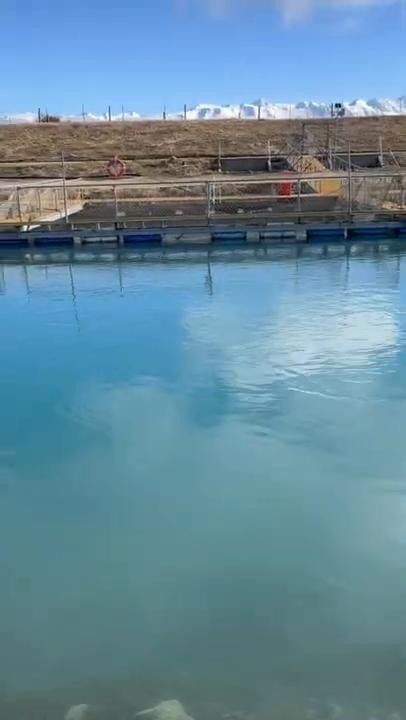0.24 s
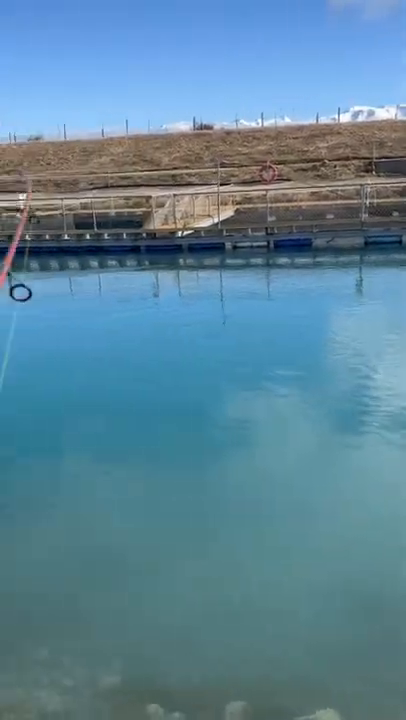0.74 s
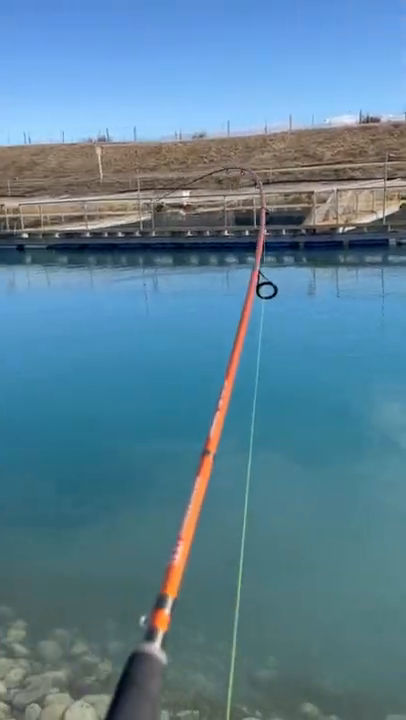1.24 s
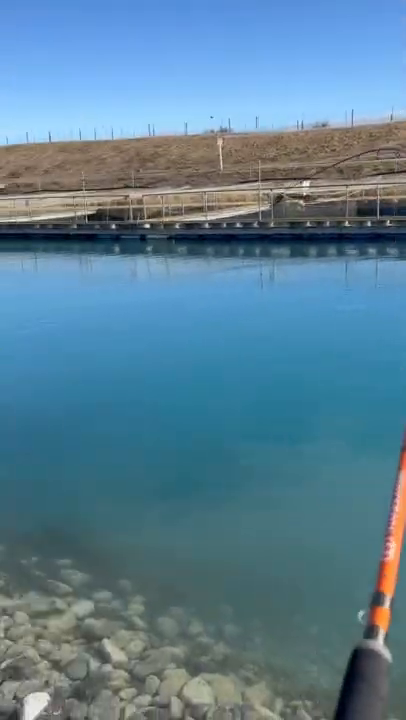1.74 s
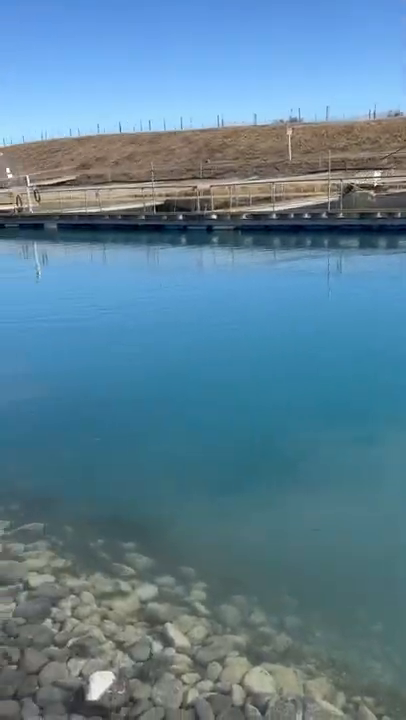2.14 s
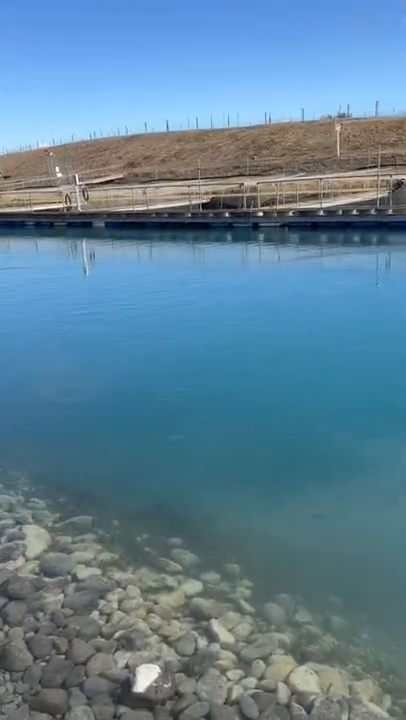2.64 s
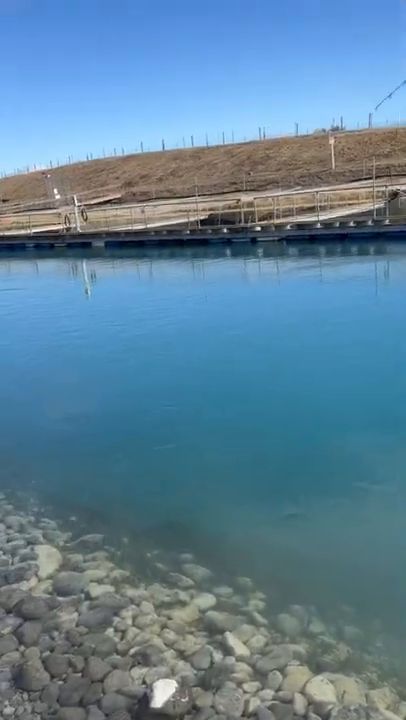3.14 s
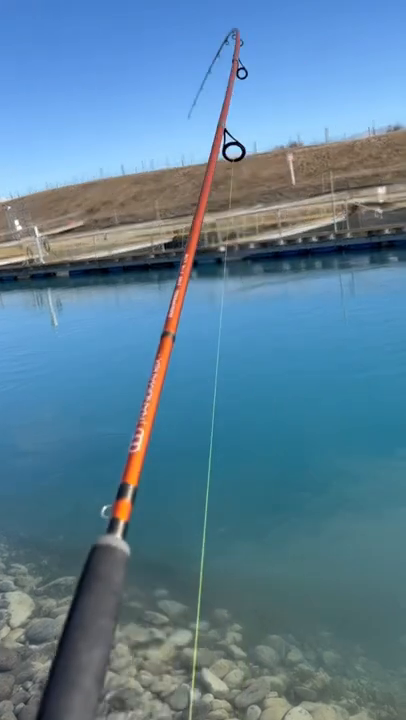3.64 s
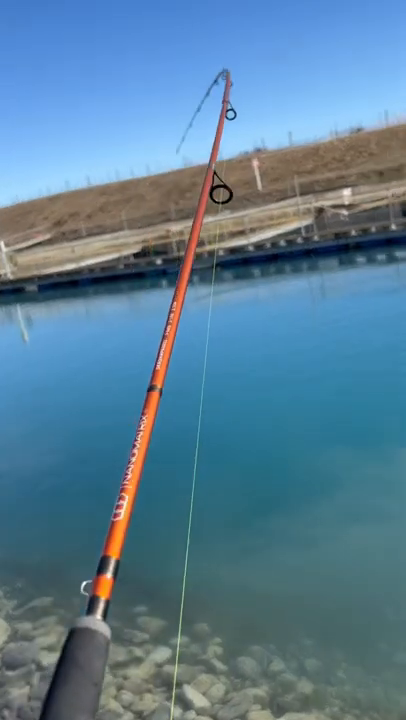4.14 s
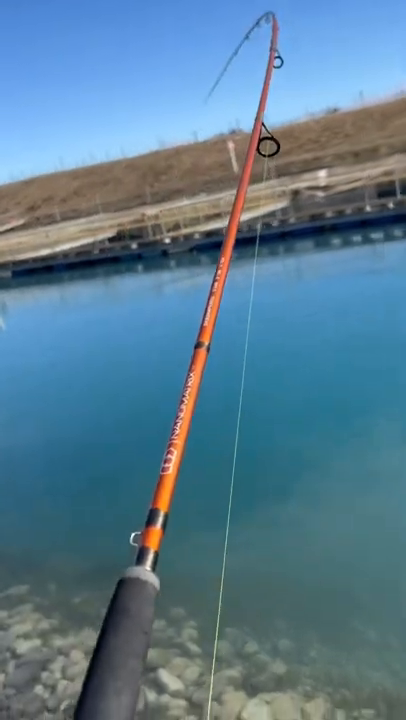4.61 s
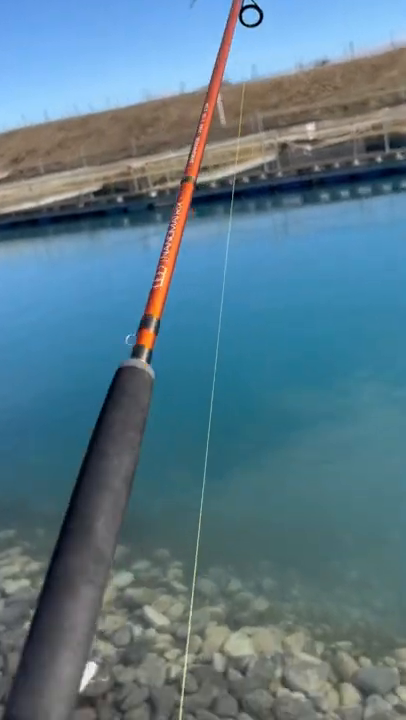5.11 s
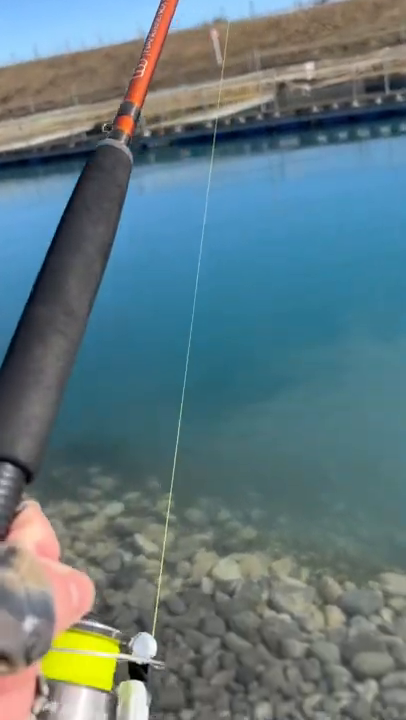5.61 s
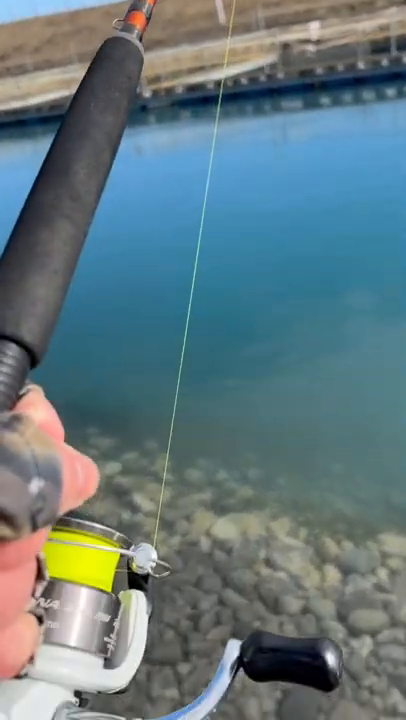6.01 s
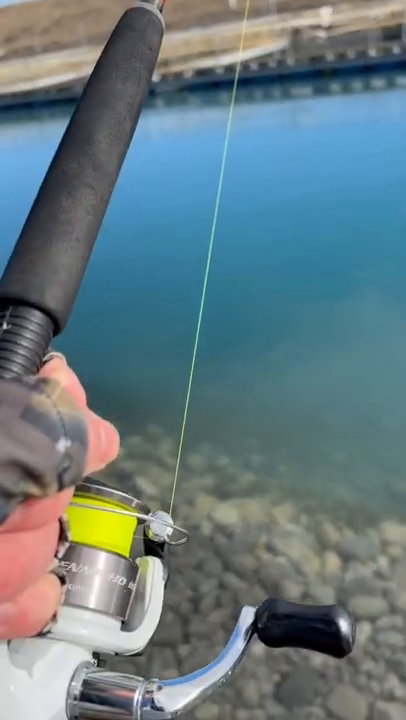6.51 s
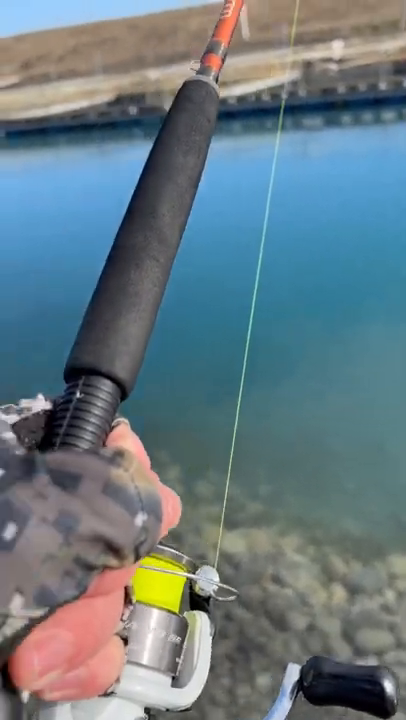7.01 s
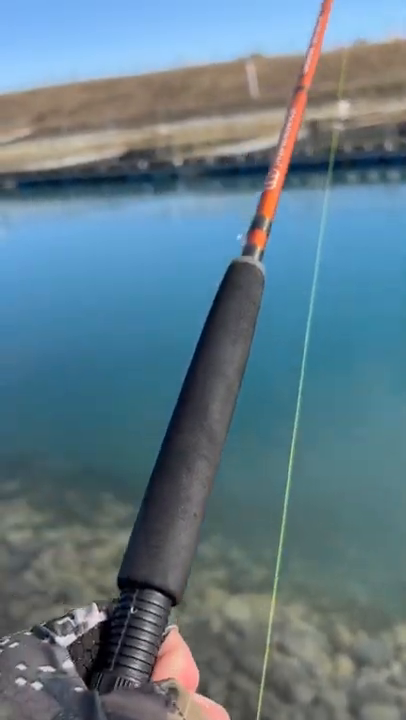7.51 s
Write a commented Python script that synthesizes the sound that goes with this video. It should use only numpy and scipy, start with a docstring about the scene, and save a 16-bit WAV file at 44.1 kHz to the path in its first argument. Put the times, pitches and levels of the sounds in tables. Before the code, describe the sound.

In quiet open air by water, a fishing reel is already starting to pay out line. From 0 s its clicker quickly builds into a bright, dry ratcheting buzz, around seventy to over a hundred clicks a second, surging near 1 s and easing by 1.7 s. It picks up again around 2.2 s, sags near 3.3 s, rises around 4.2 s, then eases. Beneath it the braid hums faintly and rubs with a grainy rasp that rings the rod. Soft low wind puffs land near 0.5 and 1.9 s; a hand rustles at 1.7 s. At 5.2 s the buzz drops to separate, louder, close clicks, about twenty-five a second, slowing to about sixteen near 6 s with small dull grip knocks around 5.9 s. The clicks then gradually quicken again to over twenty a second, softening slightly towards the end at 7.75 s. Thin metallic ringing and short echoes follow the clicks.

```python
"""A reel clicker buzzes as a fish pulls line, then slows to louder single clicks as the microphone closes in.
A spring snaps over the spool's teeth: each snap strikes short body modes and long rings of the metal spool.
Echoes follow. The braided line hums over the roller, and its grainy friction rings the rod.
The hand rustles and knocks on the grip; wind puffs are shaped noise, over hiss and a far low hum."""
import sys
import numpy as np
from scipy import signal
from scipy.fft import rfft, irfft
from scipy.io import wavfile
from scipy.ndimage import uniform_filter1d

SR = 44100
rng = np.random.default_rng(int(sys.argv[2]) if len(sys.argv) > 2 else 0)


def invert_db(x):
    """Field ratio 10**(x/20) for x, a level in decibels (scalar or array-like)."""
    u = np.asarray(x, float) / 20
    return 10 ** u


def to_wav(s):
    """Save 16-bit WAV."""
    ch = np.atleast_2d(s).T  # columns
    pcm = np.round(np.clip(ch, -1, 1) * 32767)  # PCM
    wavfile.write(sys.argv[1], SR, pcm.astype(np.int16))


N = 342061
TEETH = 18  # per spool turn


def curve(table):
    """Columns of a table, joined by straight lines in time."""
    s, *columns = np.transpose(table)
    return [np.interp(np.arange(N) / SR, s, c) for c in columns]


def unit(x):
    """Scale to rms one."""
    return x / np.sqrt(np.mean(x ** 2))


def band(x, hz, width_hz):
    """Two-pole resonance, gain one at its centre."""
    return signal.lfilter(*signal.iirpeak(hz, hz / width_hz, SR), x)


def ring(s, size, hz, t60_s, rise_s=.0001):
    """A decaying mode struck at times s; complex sizes carry the starting phase."""
    pole = 2j * np.pi * hz / SR - np.log(1000) / (t60_s * SR)
    at = np.ceil(s * SR).astype(int)
    blows = np.zeros(size.shape[:-1] + (N,), complex)
    blows[..., at] = size * np.exp(pole * (at - s * SR))
    # the contact lasts a moment, so the mode swells before it fades
    swell = np.exp(pole - 1 / (rise_s * SR))
    return signal.lfilter([1 - abs(swell)], np.poly([np.exp(pole), swell]), blows).imag


def walk(rate, size=N, per=SR):
    """Slow chance, spread one: a fresh value every per / rate steps, smoothed twice."""
    k = max(int(per / rate), 1)
    steps = np.repeat(rng.standard_normal(size // k + 1), k)
    smooth = uniform_filter1d(uniform_filter1d(steps, k), k)
    return unit(smooth[:size])


def wide(side_db, top_hz=1400):
    """Noise for both ports with an opposed part at side_db that fades out in the treble."""
    side = signal.sosfilt(signal.butter(4, top_hz, fs=SR, output="sos"), rng.standard_normal(N))
    return rng.standard_normal(N) + invert_db(side_db) * side * np.array([[1], [-1]])


def swells(table):
    """Bell-shaped swells of two layers; the second is given in dB above the first."""
    t, first, second = np.arange(N) / SR, 0, 0
    for s, length_s, db, above_db in table:
        bell = invert_db(db) * np.exp(-(2 * (t - s) / length_s) ** 2 / 2)
        first = first + bell
        second = second + invert_db(above_db) * bell
    return first, second


# spool turning while it buzzes: time_s, teeth_passed_count
SPOOL_TURN = [(0.0139, 0), (0.096, 4), (0.1679, 11), (0.3978, 27), (0.4068, 28), (0.5677, 36), (0.5964, 39),
              (0.8382, 66), (1.0394, 89), (1.1676, 103), (1.1765, 104), (1.4639, 125), (1.7003, 138),
              (1.8072, 141), (1.9521, 149), (2.0486, 156), (2.2012, 170), (2.317, 178), (2.478, 193),
              (2.636, 205), (2.6782, 208), (2.8852, 217), (3.1235, 227), (3.3086, 231), (3.5229, 240),
              (3.7121, 249), (3.7972, 252), (4.0976, 269), (4.3152, 283), (4.4684, 290), (4.7126, 302),
              (4.7692, 304), (5.0858, 316), (5.1786, 319)]
# surge once a turn, as the drag grips harder on one side: teeth_passed_count, swing_teeth
DRAG_SURGE = [(100, .8), (160, .3)]
# single slow clicks: time_s
SLOW_CLICKS_S = [5.2146, 5.2513, 5.2824, 5.323, 5.3592, 5.3985, 5.4414, 5.4776, 5.5204, 5.561, 5.598,
                 5.6404, 5.6798, 5.718, 5.7614, 5.8075, 5.862, 5.919, 5.9819, 6.0489, 6.1085, 6.168, 6.2316,
                 6.2886, 6.3415, 6.402, 6.46, 6.5173, 6.5693, 6.6233, 6.6804, 6.7337, 6.7848, 6.8326,
                 6.8822, 6.936, 6.9864, 7.0396, 7.0894, 7.143, 7.1907, 7.2385, 7.286, 7.3343, 7.3834, 7.43,
                 7.4737, 7.5175, 7.5613, 7.604, 7.641, 7.686, 7.7363]
# click strength before spring load and mode gains: time_s, level_db
CLICK_STRENGTH = [(0, -26), (.3, -24), (1.1, -24.5), (1.63, -26.5), (1.88, -25.5), (2.6, -26.5),
                  (3.5, -27.5), (3.8, -26), (4.0, -27.5), (4.5, -27), (5.17, -25), (5.22, -19.5),
                  (5.55, -20.5), (5.7, -17.5), (6.27, -18), (6.46, -20), (6.6, -19), (7.24, -20.5),
                  (7.7, -26)]


def click_times():
    """The spool turns smoothly between the listed angles, surging once a turn; each tooth gives a click."""
    hardest_tooth = 17  # where the drag grips hardest

    def surged(k):
        swing_teeth = np.interp(k, *np.transpose(DRAG_SURGE))
        return k + swing_teeth * np.sin(2 * np.pi * (k - hardest_tooth) / TEETH)

    s, teeth = np.transpose(SPOOL_TURN)
    k = surged(np.arange(teeth[-1] + 1))
    teeth = surged(teeth)
    # cubic Hermite curve of time against teeth
    slope = np.gradient(s, teeth)
    j = np.clip(np.searchsorted(teeth, k, "right") - 1, 0, len(s) - 2)
    h = np.diff(teeth)[j]
    u = (k - teeth[j]) / h
    bend = h * u * (1 - u) * ((1 - u) * slope[j] - u * slope[j + 1])
    fast = s[j] + np.diff(s)[j] * u * u * (3 - 2 * u) + bend
    s = np.r_[fast, SLOW_CLICKS_S]
    return s, np.interp(s, *np.transpose(CLICK_STRENGTH))


def spool_angle(count):
    """Spool angle in radians at each click, one tooth per click."""
    return 2 * np.pi * np.arange(count) / TEETH


def ports(count, side_db):
    """Left and right hear each blow slightly differently, drifting from tooth to tooth."""
    side = invert_db(side_db) * (walk(1, count, per=4) + 1j * walk(1, count, per=3.7))
    return 1 + side * np.array([[1], [-1]])


# stray ticks between clicks, before mode gains: time_s, level_db
STRAY_TICKS = [(2.9654, -35), (3.239, -31), (3.3144, -33), (3.3814, -36), (3.8823, -31), (4.0015, -27),
               (4.1684, -36), (5.076, -34), (5.106, -35), (5.13, -37), (5.14, -37), (5.17, -30),
               (5.2264, -30), (5.3343, -28), (5.4652, -27), (5.5112, -32), (5.577, -28), (5.6205, -27),
               (5.664, -31), (5.744, -25), (5.968, -29), (6.0711, -35)]


def stray_ticks():
    """Listed ticks plus faint ones at chance times."""
    faint_count, start_s, end_s, level_db, spread_db = 14, 2.4, 7.4, -38, 8.0
    when, how = rng.random((faint_count, 2)).T
    faint = np.c_[start_s + when * (end_s - start_s), level_db + spread_db * (how - .5)]
    return np.r_[STRAY_TICKS, faint].T


# short modes of clicker and reel body: pitch_hz
BODY_HZ = [1350, 2200, 3200, 4200, 5150, 6400, 7900, 9200, 10300, 11500, 12800, 13800, 15100, 16200]
# their decay: t60_s
BODY_T60_S = [.018, .0045, .004, .0032, .003, .0033, .0045, .0036, .0035, .0035, .004, .0033, .0038, .0035]
# gain of each mode in four ways of holding the reel (a negative swing is quietest at its angle):
# gain_db, swing_per_turn_db, loudest_deg, swing_per_half_turn_db, loudest_deg
ASIDE_MODES = [(-22.5, 0, 150, 4.4, 140), (-19, 5.5, 210, 5, 89), (-5.5, 6.5, 79, -0.5, 61),
               (-19, -2.5, 47, 11, 6.8), (-15.5, 2, 190, -2, 88), (-1.5, 0, 29, 3, 70),
               (-1.1, 2.5, 81, 4.5, 181), (-1, -1, 87, 1.5, 190), (-1.9, 3.7, 113, -0.3, 77),
               (0.4, 2, 280, -1, 55), (-4, 3, 240, 6, 39), (0, -1, 990, 5.5, 146), (-17, -7, 254, -12, 150),
               (-7, 8, 280, -13, 71)]
BEHIND_MODES = [(-13.5, 1.4, 170, 0.79, 130), (-15, 0.3, 140, 2.1, 120), (-11, 7, 73, 0.2, 144),
                (-15.5, 2.1, 160, 1.0, 12), (-3.5, 2.5, 150, 2.9, 150), (-0.7, 1.9, 34, 1, 120),
                (0.5, 2.2, 48, 3.8, 162), (-1.1, 0.5, 73, 3.8, 184), (-2, 1.2, 140, 0.6, 87),
                (0, 1.7, 290, 0.5, 101), (0.2, 2.2, 280, 1.1, 100), (-7, 2.5, 370, 2.9, 155),
                (2, 0.5, 254, 0.9, 140), (-8, 1.0, 250, 1.4, 56)]
BELOW_MODES = [(-22.5, 0.56, 170, 0.2, 230), (-16, 3.9, 125, 5.8, 112), (-8.5, 7.3, 73, 1.4, 137),
               (-10.5, 3.3, 22, 0.4, 19), (-8, 3.2, 160, 2.3, 177), (-4.5, 2.9, 126, 1.9, 90),
               (-0.5, 0.96, 6, 1.4, 12), (-2.2, 2.7, 200, 1.1, 130), (-2, 3.2, 180, 3.4, 7),
               (-1, 1.6, 300, 2.7, 72), (-17, 1.3, 280, 0.3, 81), (3.5, 3.4, 250, 1.8, 160),
               (-25, 3.5, 150, 1.8, 220), (7, 3.2, 280, 6, 8)]
NEAR_MODES = [(-22, 2.4, 437, 1.4, 55), (-17, 5.1, 116, 2.8, 79), (-17.5, 13.5, 25, 4.6, 105),
              (-11, 4.2, 21, 0.57, 3.7), (-6.5, 5.4, 108, 0.61, 3), (-14, 0.86, 140, 4.8, 50),
              (-2.5, 0.6, 260, 1, 280), (-0.5, 4.7, 94, 5.2, 173), (-3, 1.7, 85, 1.8, 100),
              (-5, 6, 318, 0.77, 100), (-3, 6, 370, 0.77, 10), (4, 1.6, 120, 5.4, 184),
              (-10.5, 0.34, 49, 7.7, 22), (8, 1.2, 190, 4.6, 12)]
# moves from one hold to the next: time_s
HOLD_CHANGES_S = (1.8, 2.75, 5.2)


def body_snaps(s, click_db, lead_s):
    """Each click or tick strikes the short modes, their gains turning with the spool."""
    scatter_db, phase_wobble_rad, lag_cycles = 1.9, .4, 1.52
    count = len(s)
    angle = spool_angle(count)
    hold = np.searchsorted(HOLD_CHANGES_S, s)
    tick_s, tick_db = stray_ticks()
    snap = 0
    for k, (hz, t60_s) in enumerate(zip(BODY_HZ, BODY_T60_S)):
        holds = np.array([ASIDE_MODES[k], BEHIND_MODES[k], BELOW_MODES[k], NEAR_MODES[k]])
        db, turn_db, turn_deg, half_db, half_deg = holds[hold].T
        db = db + turn_db * np.cos(angle - np.radians(turn_deg))
        db = db + half_db * np.cos(2 * (angle - np.radians(half_deg)))
        db = db + scatter_db * walk(1, count, per=2)
        # the path to the microphone changes with the spool angle; the phase alternates from mode to mode and
        # wobbles slowly from click to click
        phase = np.pi * k + phase_wobble_rad * walk(1, count, per=3)
        size = invert_db(click_db + db - 10.5) * np.exp(1j * phase) * ports(count, -18.5)
        tick_phase = 2 * np.pi * rng.random(len(tick_s))
        stray = invert_db(tick_db + BELOW_MODES[k][0] - 12) * np.exp(1j * tick_phase) * np.ones((2, 1))
        # low modes build up later than high ones
        late_s = np.r_[s, tick_s - lead_s] + lag_cycles / hz
        snap = snap + ring(late_s, np.c_[size, stray], hz, t60_s, rise_s=0.000067 + 0.22 / hz)
    return snap


# paths off the hand and reel frame: delay_ms, swing_ms, longest_deg, gain_db
GLANCING_PATHS = [(.5, .15, 60, -13), (1.102, .3, 200, -6.5)]


def glancing(direct, s):
    """Adds glancing paths, longer or shorter as the spool turns."""
    now, count = np.arange(N), len(s)
    click = np.clip(np.searchsorted(s * SR, now) - 1, 0, count - 1)
    snap = direct
    for delay_ms, swing_ms, deg, db in GLANCING_PATHS:
        ms = delay_ms + swing_ms * np.cos(spool_angle(count) - np.radians(deg))
        ms = ms + .04 * rng.standard_normal(count)
        lag = (ms * SR / 1000).round().astype(int)[click]
        snap = snap + invert_db(db) * direct[:, np.maximum(now - lag, 0)]
    return snap


# long rings of the metal spool: pitch_hz
SPOOL_RING_HZ = [4708, 4671, 7600, 9950, 14856, 14790]
# their strength: relative_db
SPOOL_RING_DB = [1, -9, -7, -4.5, 7.5, -9]
# their decay: t60_s
SPOOL_RING_T60_S = [.22, .22, .045, .04, .05, .04]
# reach of the rings below 5 kHz, before click-rate gain: time_s, level_db
RING_REACH = [(0, -71), (.7, -67), (.85, -59), (1.4, -65.5), (2.1, -61), (3.2, -61), (3.35, -66),
              (4.4, -68.5), (5.7, -62), (5.94, -57), (6.1, -67), (7.25, -63), (7.4, -59), (7.76, -62)]


def spool_rings(s, click_db):
    """Clicks strike long spool modes; those above 5 kHz partly follow click strength."""
    scatter_db, high_share, high_db = 3.5, .45, -40
    count = len(s)
    low_db = np.interp(s, *np.transpose(RING_REACH))
    # slower clicks must each be heard louder for the same steady ring
    low_db = low_db + 10 * np.log10(np.gradient(s) / 0.014) + 6
    rings = 0
    for hz, db, t60_s in zip(SPOOL_RING_HZ, SPOOL_RING_DB, SPOOL_RING_T60_S):
        low = hz < 5000
        reach_db = low_db if low else high_share * click_db + high_db
        size = invert_db(reach_db + db + scatter_db * rng.standard_normal(count))
        size = size * np.exp(2j * np.pi * rng.random(count))
        rings = rings + ring(s, size * ports(count, -11 if low else -24), hz, t60_s)
    return rings


def reel(lead_s=.0004):
    """Every click strikes the short body modes and the long spool rings."""
    s, click_db = click_times()
    s = s - lead_s
    # at speed the spring has less time to load, so it snaps more weakly
    click_db = click_db + 1.6 * np.log2(np.minimum(np.gradient(s) / 0.01, 1))
    snap = glancing(body_snaps(s, click_db, lead_s), s)
    snap = signal.sosfilt(signal.butter(2, 900, "high", fs=SR, output="sos"), snap)
    return snap, spool_rings(s, click_db)


# echo off the ground and the angler, before flicker: time_s, delay_ms, gain_db
CLICK_ECHO = [(0, 8.0, -24), (.9, 7.0, -24), (1.6, 8.0, -24), (3, 6.5, -22), (4.2, 7.0, -22),
              (5.4, 9.5, -28), (6.3, 7.5, -27), (7.8, 8.0, -30)]


def nearby(snap, tail_db=-22, t60_s=0.095):
    """One clear, band-limited echo and a short scatter of weaker ones."""
    delay_ms, echo_db = curve(CLICK_ECHO)
    now = np.arange(N)
    late = (now - delay_ms * SR / 1000).round()
    echo = np.array([np.interp(late, now, c) for c in band(snap, 5400, 7100)])
    echo = invert_db(echo_db + 6.5 * walk(12)) * echo
    fade = np.exp(-np.log(1000) * np.arange(4096) / SR / t60_s)
    tail = fade * rng.standard_normal(4096)
    tail = invert_db(tail_db) * tail / np.sqrt(np.sum(fade ** 2))
    scatter = signal.fftconvolve(snap.mean(axis=0), tail)[:N]
    return echo + invert_db(echo_db - echo_db[0]) * scatter


def line_motion(waver=0.02498):
    """Spool speed (teeth per sample), octaves above 60 teeth/s, and phase of the weave."""
    weave_per_tooth = 5.35
    s = click_times()[0]
    teeth = np.interp(np.arange(N) / SR, s, np.arange(len(s)))
    speed = uniform_filter1d(np.gradient(teeth), 600).clip(1 / SR)
    octaves = np.log2(uniform_filter1d(speed, SR // 30) * SR / 60)
    drift = 1 + waver * (walk(40) + 0.781 * walk(200))
    phase = 2 * np.pi * np.cumsum(weave_per_tooth * speed * drift)
    return speed, octaves, phase


# braid hum over the roller at 60 teeth/s, before waver and surge: time_s, level_db
WEAVE_HUM = [(0, -80), (.55, -79), (.9, -71), (1.4, -69), (1.9, -66), (2.3, -74), (2.57, -64), (2.75, -72),
             (4, -65), (4.6, -68), (4.9, -57), (5.1, -60), (5.3, -75), (7.8, -62)]


def weave_hum(speed, octaves, phase):
    """The braid hums in step with the spool, louder with speed."""
    db_per_octave, waver_db = 7.5, 3.6
    hum_db = curve(WEAVE_HUM)[0] + db_per_octave * octaves + waver_db * walk(60)
    hum = (np.cos(phase) + invert_db(-14) * np.cos(2 * phase)) * invert_db(hum_db)
    # it speaks up at the top of each surge
    hum = hum * (speed / uniform_filter1d(speed, SR // 4)) ** 1.6
    return hum * invert_db(np.array([[-1.0], [1.0]]))


# rub at 60 teeth/s, as the rod turns towards the microphone and away, before waver: time_s, level_db
LINE_RUB = [(0, -70.5), (.5, -67), (.6, -60.5), (1.2, -59), (1.9, -56), (2.3, -58), (2.7, -55),
            (3.6, -55.5), (4.6, -60), (5.1, -54.5), (5.6, -57.5), (6.3, -58.5), (7.1, -59.5), (7.76, -55.5)]
# rod modes, before waver: pitch_hz, width_hz, relative_db_per_hz
ROD_MODES = [(354, 80, -12), (820, 116, -2.5), (977.4, 20, -1.5), (1155.7, 38, 5), (1476, 66, -3.5),
             (1601, 62, -3), (2103, 195, -8.5), (2480, 325, -13.5), (2750, 1330, -17)]


def line_rub(octaves, phase):
    """Grainy friction, pulsing with the weave, rings the rod over a bed of hiss."""
    db_per_octave, waver_db = 6.5, 1.5
    rub_db = curve(LINE_RUB)[0] + db_per_octave * octaves + waver_db * walk(12)
    grit = wide(-12.0) * invert_db(2.0 * walk(150)) * (1 + 0.74 * np.cos(phase))
    rod = 0
    for hz, width_hz, db in ROD_MODES:
        mode = unit(band(band(grit, hz, width_hz), hz, 4 * width_hz))
        rod = rod + invert_db(db + 1.1 * walk(22)) * mode * np.sqrt(width_hz)
    bed = unit(band(band(grit, 3000, 4000), 3400, 4100)) * invert_db(0.73 * rub_db - 26)
    return unit(rod) * invert_db(rub_db) + bed


def line():
    """Hum and rub of the line, both driven by the spool's speed."""
    speed, octaves, phase = line_motion()
    return weave_hum(speed, octaves, phase) + line_rub(octaves, phase)


# hand resting on the grip, before waver: time_s, level_db, scrape_above_db
GRIP_REST = [(0, -70, -4), (1.2, -66, -1), (2, -69, -7.5), (4.4, -66.5, -1), (5, -71, -3),
             (5.7, -71.5, -4.5), (6.25, -70.5, -0.5), (6.5, -76, -9), (7.35, -74.5, -3), (7.76, -69.5, -1)]
# shifts of the hand, before waver: time_s, length_s, level_db, scrape_above_db
HAND_SHIFTS = [(.7, 0.092, -64, -5), (1.73, 0.084, -54, -1), (2.98, 0.093, -64.5, -12),
               (3.39, 0.075, -63, -5), (3.68, 0.074, -65.5, -9), (5.55, .08, -65, -11),
               (5.89, .035, -57, 2), (6.09, 0.098, -63, -6), (7.52, .1, -67.5, -8)]
# knocks on the grip: time_s, strength_db, pitch_hz, t60_s
GRIP_KNOCKS = [(5.833, -50, 584, 0.028), (5.87, -41.5, 860, 0.033), (5.876, -37.5, 600, 0.021),
               (5.923, -50, 740, 0.035), (6.133, -49, 600, 0.09)]


def hand():
    """Dull rustle and brighter scrape, and short knocks on the foam grip."""
    level_db, scrape_db = curve(GRIP_REST)
    rest = invert_db(level_db + 2.4 * walk(6))
    shift, shift_scrape = swells(HAND_SHIFTS)
    dull = unit(band(band(wide(-10.0), 207, 135), 207, 135))
    scrape = unit(band(band(wide(2.0), 635, 690), 635, 690))
    rustle = (rest + shift) * dull + (rest * invert_db(scrape_db) + shift_scrape) * scrape
    out = rustle * invert_db(2.0 * walk(30))
    for s, db, hz, t60_s in GRIP_KNOCKS:
        at_s, size = np.array([s]), invert_db(db) * np.array([[1.1], [.9]])
        out = out + ring(at_s, size, hz, t60_s) + ring(at_s, size, 2.44 * hz, 0.18 * t60_s)
    return out


# steady breeze, before waver: time_s, level_db, deep_above_db
BREEZE = [(0, -58, 1), (.9, -59, 0.5), (1.4, -63, -2), (1.8, -66, -6), (3, -65, -14), (4.5, -66, -12),
          (5.1, -66, -3), (5.6, -68, -8), (7.76, -68, -8)]
# gusts: time_s, length_s, level_db, deep_above_db
WIND_GUSTS = [(.41, 0.051, -51.5, 11), (.49, 0.084, -44, 4.5), (.73, .08, -52, -15),
              (1.28, 0.094, -58, 4.5), (1.64, 0.055, -57, -1), (1.92, 0.066, -42, -3),
              (2.29, .07, -57, -20), (2.46, .08, -62.5, 0), (3.09, 0.053, -54.5, -15),
              (3.35, 0.046, -61, -16), (4.79, .07, -60, 4), (5.03, .07, -63, 8), (5.9, .06, -61, -10)]


def wind():
    """Deep buffeting, nearly alike in both ports: a wavering breeze with gusts."""
    waver_db = 2.5
    level_db, deep_db = curve(BREEZE)
    breeze = invert_db(level_db + waver_db * walk(8))
    gust, deep_gust = swells(WIND_GUSTS)
    puff = unit(band(band(wide(-24), 75, 38), 75, 38))
    deep = unit(band(band(wide(-29), 42.8, 23), 42.8, 23))
    return (breeze + gust) * puff + (breeze * invert_db(deep_db) + deep_gust) * deep


# hiss spectrum: pitch_hz, relative_db_per_hz
AIR_SPECTRUM = [(25, -8), (125, 13.5), (220, -4), (450, -57), (1300, -21), (1750, -27), (2450, -2),
                (4000, -63), (8000, -16.5), (15500, -31), (17000, -52)]


def air():
    """Open-air hiss of shaped noise and a wavering far hum of narrow-band noise."""
    hiss_db, hum_hz, hum_width_hz, hum_db = -66, 128.3, 7.8, -63
    hz, db = np.transpose(AIR_SPECTRUM)
    shape = invert_db(np.interp(np.log(np.fft.rfftfreq(N, 1 / SR) + 1), np.log(hz), db))
    hiss = unit(irfft(rfft(wide(-16)) * shape, N)) * invert_db(hiss_db)
    return hiss + unit(band(wide(-19), hum_hz, hum_width_hz)) * invert_db(hum_db)


def scene():
    """Reel, its echoes, line, hand, wind and air."""
    snap, rings = reel()
    return snap + rings + nearby(snap) + line() + hand() + wind() + air()


def band_limit(x):
    """A steep low-pass at the top of the band."""
    return signal.sosfilt(signal.butter(12, 17030, fs=SR, output="sos"), x)


def record(dry):
    """A steep low-pass cuts the top above 15 kHz."""
    mix = signal.sosfilt(signal.butter(8, 15000, fs=SR, output="sos"), dry)
    return band_limit(mix)


dry = scene()
out = record(dry)
to_wav(out)
```